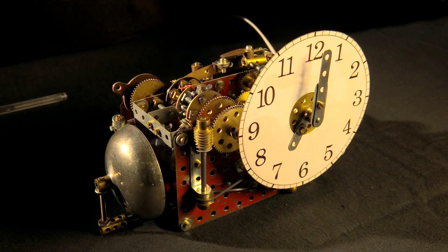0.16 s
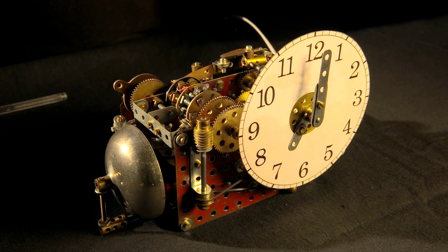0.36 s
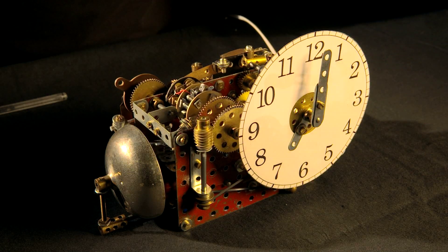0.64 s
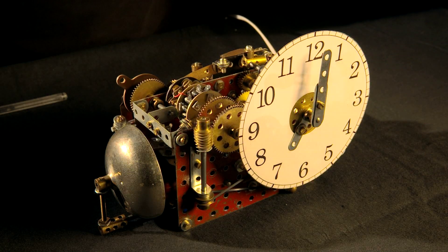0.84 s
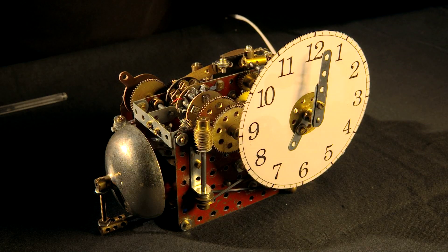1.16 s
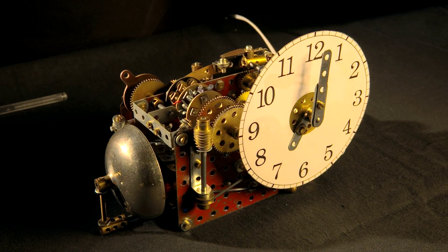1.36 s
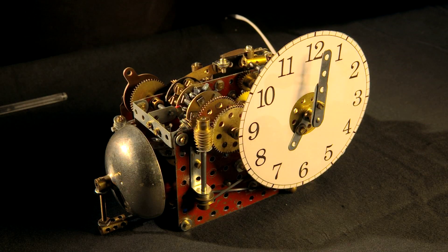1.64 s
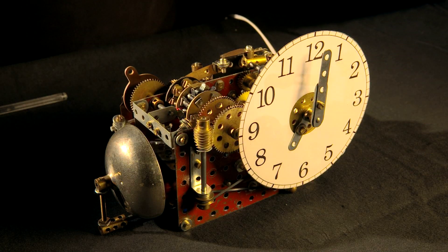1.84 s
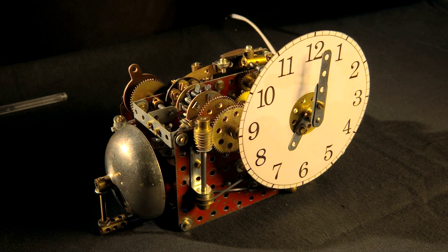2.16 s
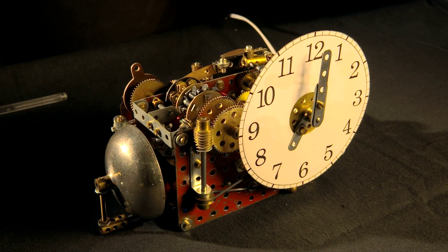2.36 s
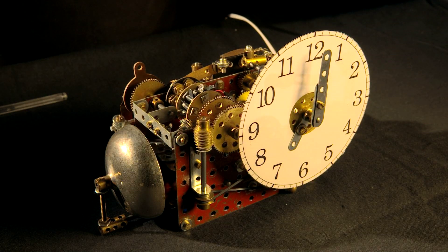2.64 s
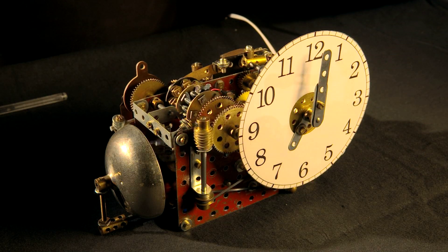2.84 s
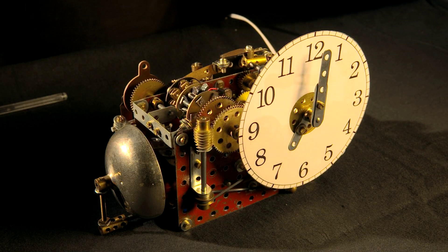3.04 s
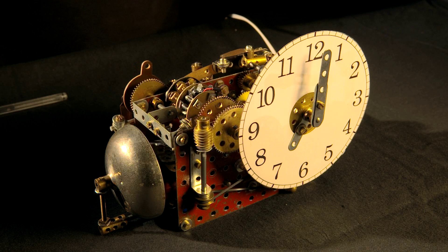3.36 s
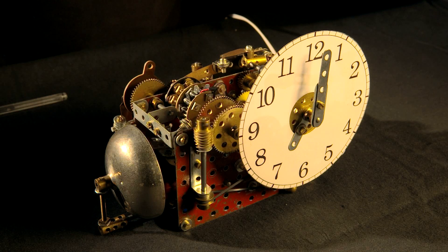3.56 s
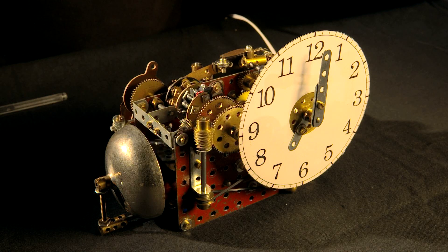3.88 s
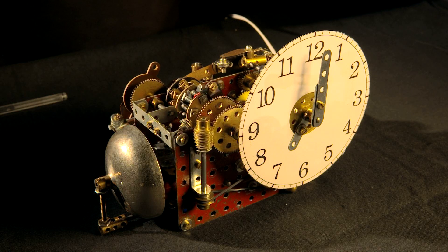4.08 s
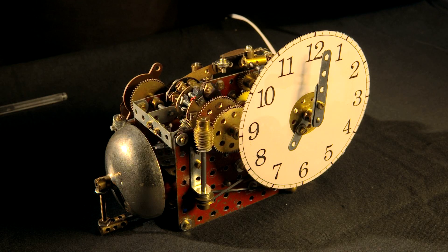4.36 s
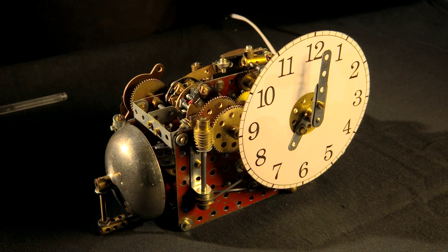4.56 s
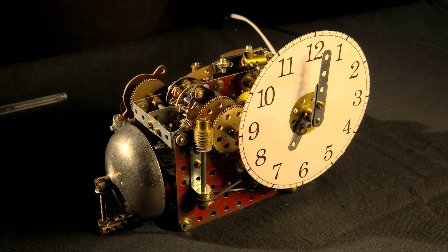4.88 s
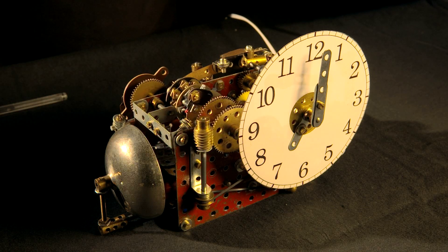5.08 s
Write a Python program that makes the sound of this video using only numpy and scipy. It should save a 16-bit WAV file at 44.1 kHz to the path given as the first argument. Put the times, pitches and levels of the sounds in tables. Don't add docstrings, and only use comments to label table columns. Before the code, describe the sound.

Close, dry mono pickup of a small clockwork bell striker on a table. A bell is already ringing; five sharp steel strokes follow at irregular gaps, the first hardest, their long high hums overlapping and gently beating. Faint gear whirr, small lever knocks and tiny squeaks lie beneath. At about four seconds a stop lever clunks, the gears halt, and the bell rings on in a small quiet room.

```python
import sys
import numpy as np
from scipy import signal
from scipy.fft import rfft, irfft, next_fast_len
from scipy.io import wavfile
from scipy.ndimage import uniform_filter1d, map_coordinates

SR = 44100
rng = np.random.default_rng(int(sys.argv[2]) if len(sys.argv) > 2 else 0)


def rack_gain(trim_db):
    fader = np.asarray(trim_db, float)
    return 10 ** (fader / 20)


def wrap_up_sound(samples):
    columns = np.atleast_2d(samples).T
    tamed = np.clip(columns, -1, 1)
    steps = np.round(tamed * 32767).astype(np.int16)
    wavfile.write(sys.argv[1], SR, steps)


N = 230246

# (frequency [Hz], twin frequency [Hz], t60 [s], twin t60 [s])
PAIRS = [
    (1258.86, 1248.55, 19.55, 21.16),
    (3178.01, 3179.4, 7.18, 8.37),
    (5609.44, 5610.86, 2.49, 2.52),
    (8446.84, 8449.06, 1.14, 0.91),
    (11661.3, 11662.9, 0.56, 0.53),
]
# (time [s], peak level [dB], twin peak level [dB], wait until they swell together [s])
HUM_STATES = [
    (0, -50.9, -66.1, 0.096),
    (0.2313, -52.5, -55.7, 0.022),
    (0.8603, -48.4, -53.0, 0.03),
    (1.6234, -46.6, -50.7, 0.019),
    (2.9223, -45.5, -55.6, 0.083),
    (3.5574, -67.9, -59.5, 0.084),
]
PRIME_STATES = [
    (0, -39.3, -38.2, 0.697),
    (0.2313, -35.9, -43.5, 0.27),
    (0.8603, -37.0, -36.2, 0.208),
    (1.6234, -55.0, -36.6, 0.35),
    (2.9223, -44.3, -35.1, 0.327),
    (3.5574, -50.2, -37.2, 0.394),
]
# (time [s], first level [dB], second level [dB], third level [dB])
UPPER_STATES = [
    (-0.3, -32.5, -17.3, -15.6),
    (0.2313, -34.7, -18.3, -16.1),
    (0.8603, -30.0, -20.6, -27.8),
    (1.6234, -40.0, -37.4, -22.3),
    (2.9223, -32.3, -32.9, -25.0),
    (3.5574, -37.8, -32.2, -22.8),
]
# (level under the partial [dB], wait until they swell together [s])
UPPER_TWINS = [(-7, 0.66), (-20.5, .33), (-14, 0.25)]


def dome():
    t = np.arange(N) / SR
    upper = np.array(UPPER_STATES)
    states_of_pairs = [np.array(HUM_STATES), np.array(PRIME_STATES)]
    for db, (twin_db, swell) in zip(upper.T[1:], UPPER_TWINS):
        states_of_pairs.append(np.c_[upper[:, 0], db, db + twin_db, np.full(len(db), swell)])
    ring = np.zeros(N)
    for (hz, twin_hz, t60, twin_t60), states in zip(PAIRS, states_of_pairs):
        latest = np.searchsorted(states[:, 0], t, side="right") - 1
        start, db, twin_db, swell = states[latest].T
        age = t - start
        turn = 2 * np.pi * (age - swell)
        ring += rack_gain(db - 60 * age / t60) * np.sin(hz * turn)
        ring += rack_gain(twin_db - 60 * age / twin_t60) * np.sin(twin_hz * turn)
    return ring


# (time [s], crack level [dB], level near 12 kHz [dB], near 15 kHz [dB], near 14 kHz [dB])
BLOWS = [
    (0.2313, 1.1, -20.3, -15.0, -30.0),
    (0.8603, -8.0, -22.9, -32.9, -30.9),
    (1.6234, -9.9, -22.9, -22.8, -49.0),
    (2.9223, -10.4, -27.8, -22.6, -37.0),
    (3.5574, -11.2, -22.6, -24.6, -40.8),
]
# (frequency [Hz], level [dB], t60 [s], column of BLOWS that drives it [index])
BRIGHT = [(12286, 0, .145, 2), (12256, -17, .17, 2), (15254, 0, .08, 3), (13869, 0, .085, 4),
          (13332, -4, .08, 4), (6933, -32, .075, 1)]


def hammer():
    bright, t = np.zeros(N + SR), np.arange(SR // 2) / SR
    for blow in BLOWS:
        for hz, db, t60, column in BRIGHT:
            partial = rack_gain(blow[column] + db - 60 * t / t60) * np.sin(2 * np.pi * hz * t)
            bright[round(blow[0] * SR):][:len(t)] += partial
    s, crack_db = np.array(BLOWS)[:, :2].T
    snap = taps(s + 0.00005, crack_db + 10.5) + taps(s + 0.0012, crack_db + 7)
    rattle = bursts(s + 0.0004, crack_db - 6, 0.008) + bursts(s, crack_db - 25, 0.04)
    steel = body([(6400, 1040, 2), (8330, 1000, 1.1), (12700, 2300, 0.81)])
    shank = body([(2220, 280, -5.5)])
    return bright[:N] + filtered(snap + rattle, steel) + filtered(snap, shank)


# (time [s], level [dB], dry shank tick at the blow [dB])
RELEASES = [
    (0.197, -2.5, -50),
    (0.826, 1, -43),
    (1.601, 1.6, -34.5),
    (2.896, 2.6, -37),
    (3.529, 2, -31),
]
# (share of the fall [0-1 up to the blow], knock [dB], tick [dB], clack [dB], table [dB])
STROKE = [
    (0.01, -45, -72, -63, -44.5),
    (0.299, -50, -64, -72, -50.5),
    (0.64, -45, -75, -74, -45.5),
    (1.5, -44.5, -73, -58, -34.5),
]
# (time [s], knock level [dB], table level [dB])
PAWL = [
    (0.493, -46.5, -47),
    (1.254, -49, -44),
    (1.351, -54, -53),
    (1.798, -51, -43.5),
    (1.896, -62, -55),
    (2.616, -54, -48.5),
    (3.183, -49.5, -42.5),
    (3.665, -53.5, -57),
    (3.838, -51.5, -50.5),
    (3.946, -48, -47.5),
]
# (time [s], knock [dB], tick [dB], clack [dB], table [dB])
MISS = [
    (2.14, -49, -62, -62, -50),
    (2.157, -40, -68, -63, -35.5),
    (2.178, -39, -77, -50.5, -64),
    (2.186, -45, -44, -43.5, -43),
    (2.194, -53, -60, -49, -35.5),
]
# (time [s], knock [dB], tick [dB], clack [dB], table [dB])
STOP = [
    (4.107, -19, -38, -26, -22),
    (4.1105, -34, -46, -35, -34),
    (4.146, -50, -58, -37, -42),
    (4.168, -52, -62, -46, -70),
    (4.266, -47, -52, -53, -52),
]


def contacts():
    light_t60, heavy_t60, stop_t60 = 0.023, 0.048, 0.015
    rows = []
    for (release, db, shank_db), (blow, *_) in zip(RELEASES, BLOWS):
        for share, *parts_db in STROKE:
            rows.append((release + share * (blow - release), *(db + np.array(parts_db)), light_t60))
        rows.append((blow - 0.0015, shank_db - 8, shank_db, shank_db - 25, shank_db - 43, 0.006))
    rows.append((SQUEAKS[4][0], -67, -70, -50, -58, light_t60))
    for s, knock_db, table_db in PAWL:
        rows.append((s, knock_db, knock_db - 7, knock_db - 18, table_db, light_t60))
    rows += [(*row, heavy_t60) for row in MISS]
    rows += [(*row, stop_t60) for row in STOP]
    return np.transpose(rows)


# (frequency [Hz], width [Hz], level [dB])
FRAME = [(250, 26, 2), (294, 24, 2), (390, 90, -8), (523, 45, 0), (680, 160, -6), (800, 160, -5),
         (1080, 350, -8)]
# (frequency [Hz], width [Hz], level [dB])
LEVER = [(258, 29, 8), (377, 66, 2), (500, 52, -4.5), (694, 400, -16), (1110, 250, -13.5)]
# (frequency [Hz], width [Hz], level [dB])
TABLE = [(107, 15, 0), (165, 40, -12)]
STOP_S, EASE_S = 4.11, 0.11


def levers():
    s, knock_db, tick_db, clack_db, table_db, t60 = contacts()
    s = s + 0.0015
    push = bursts(s, knock_db + 7, 2.5 * t60) - taps(s, knock_db + 31)
    heavy = np.abs(np.arange(N) / SR - STOP_S - 0.05) < 0.1
    knock = filtered(push * heavy, body(FRAME)) + filtered(push * ~heavy, body(LEVER))
    dry_push = bursts(s, tick_db + 10, 1.3 * t60) + taps(s, tick_db + 23.5)
    tick = filtered(dry_push, body([(815, 1540, -2), (2230, 1370, -1.5)]))
    steel = body([(4270, 1100, -8.5), (7760, 1100, 1.0), (11700, 2100, -5.5), (15200, 1200, -13)])
    clack = filtered(bursts(s, clack_db + 15.0, 0.4 * t60), steel)
    boom = filtered(taps(s, table_db + 51), lambda f: body(TABLE)(f) / (1 + 1j * f / 200))
    return knock + tick + clack + boom


def loose_parts():
    shaking = bursts(STOP[0][0] + 0.0023, -38, 0.17) * rack_gain(4 * wobble(400))
    parts = body([(420, 350, 0), (940, 570, 6), (2100, 2100, -6), (5000, 3000, -5), (9500, 4000, -29)])
    return filtered(shaking, parts)


# (time [s], peak level [dB])
JOLTS = [
    (2.169, -43.5),
    (2.215, -47),
    (4.11, -48),
    (4.289, -43),
]


def table_jolts():
    pushes = JOLTS + [(s + 0.0044, -36.5 + 0.25 * crack_db) for s, crack_db, *_ in BLOWS]
    return filtered(taps(*np.transpose(pushes)), lambda f: rack_gain(55) * body([(48, 30, 0)])(f) ** 2)


# (time [s], length [s], frequency [Hz], level [dB], chop [0-1])
SQUEAKS = [
    (0.044, 0.029, 3870, -46.5, 0.7),
    (0.053, 0.022, 4450, -55.5, 0.4),
    (0.048, 0.024, 10840, -53, 1),
    (1.958, 0.032, 3970, -56, 0),
    (1.982, 0.041, 3900, -60, 0.5),
    (2.107, 0.036, 3970, -63, .2),
    (3.712, 0.16, 2150, -80, .1),
    (3.85, 0.067, 2140, -77, .1),
    (3.96, 0.14, 2140, -79, 0),
]


def squeaks():
    t, out = np.arange(N) / SR, np.zeros(N)
    for s, length, hz, db, chop in SQUEAKS:
        shape = np.abs(np.sin(np.pi * np.clip((t - s) / length, 0, 1))) ** 0.6
        slips = 1 + chop * np.cos(2 * np.pi * 232 * (t - s))
        pitch = hz * (1 + 0.0054 * wobble(120))
        tone = np.sin(2 * np.pi * np.cumsum(pitch) / SR)
        out += rack_gain(db + 2.5 * wobble(74)) * shape * slips * tone
    return out


# (time [s], level [dB])
LOAD = [(0.0, -77), (0.42, -60), (1.35, -71.5), (1.6, -65), (2.05, -71), (2.36, -82.5), (2.48, -61),
        (2.63, -65), (2.92, -80), (3.02, -65.5), (3.39, -63.5), (4.19, -67), (4.49, -69.5), (4.71, -82.5),
        (4.83, -74), (5.22, -78.5)]
# (frequency [Hz], width [Hz], level [dB])
TEETH = [(3480, 150, 4), (5560, 160, 5), (6970, 380, 5.5), (8040, 330, -1), (9060, 410, 3.5),
         (10390, 400, 0), (13900, 3200, -9)]


def gear_teeth(strain_db):
    passed = np.cumsum(116.5 * (1 + 0.012 * wobble(2.1))) / SR
    at = np.flatnonzero(np.diff(np.floor(passed)))
    leaf_db = 4 * np.cos(2 * np.pi * np.arange(len(at)) / 10) + 3 * rng.standard_normal(len(at))
    decay = rack_gain(-60 * np.arange(300) / SR / 0.032)
    ticks = np.convolve(np.bincount(at, rack_gain(leaf_db), N), decay)[:N]
    teeth = unit(filtered((unit(ticks) + 0.57) * rng.standard_normal(N), body(TEETH)))
    return rack_gain(-62 + 0.06 * strain_db - 3) * teeth


def frame_shake(shake_db):
    sway = unit(filtered(rng.standard_normal(N), lambda f: body([(34, 45, 0)])(f) ** 2))
    return rack_gain(shake_db + 1.0) * rack_gain(3 * wobble(11)) * sway


def wheel_rumble(strain_db, idle):
    t = np.arange(N) / SR
    kicks = sum(np.exp(-np.abs(t - row[0]) / 0.05) * (t >= row[0]) for row in BLOWS + MISS[-1:])
    rumble_db = -65.5 + 10.5 * kicks - 0.35 * strain_db * (1 - idle) - 8 * idle
    wheels = body([(106, 9.1, 6), (189.0, 43, -3), (230, 72, -11.5), (356, 49, -17.0)])
    rumble = unit(filtered(rng.standard_normal(N), wheels))
    return rack_gain(rumble_db - 0.5) * rack_gain(2 * wobble(30)) * rumble


def bearings(idle):
    t = np.arange(N) / SR
    dryness_db = 9 * np.exp(-((t - 1.95) / 0.2) ** 2)
    rub_db = -84 + 2.5 * wobble(3.5) - 10 * idle + dryness_db
    rub = unit(filtered(rng.standard_normal(N), lambda f: body([(4020, 80, 0)])(f) ** 2))
    pivots = body([(930, 10, -6), (1640, 12, 0), (1890, 70, -7)])
    whine = unit(filtered(rng.standard_normal(N), lambda f: pivots(f) ** 2))
    return rack_gain(rub_db + 3.5) * rack_gain(3.3 * wobble(34)) * rub + rack_gain(-81 + 1.5 * wobble(5)) * whine


def train():
    t = np.arange(N) / SR
    shake_db = np.interp(t, *np.transpose(LOAD))
    strain_db = shake_db - shake_db.mean()
    idle = np.clip((t - STOP_S) / EASE_S, 0, 1)
    return gear_teeth(strain_db) + frame_shake(shake_db) + wheel_rumble(strain_db, idle) + bearings(idle)


# (frequency [Hz], t60 [s])
WALLS = [(150, 0.45), (700, 0.14), (2000, 0.11), (12000, 0.063)]


def room(x):
    hz, t, z = signal.stft(rng.standard_normal(SR // 2), SR, nperseg=256)
    fading = z * rack_gain(-60 * t / along(WALLS, hz)[:, None])
    tail = signal.istft(fading, SR, nperseg=256)[1]
    return signal.fftconvolve(np.pad(x, (200, 0)), tail / np.linalg.norm(tail))[:N]


# (frequency [Hz], width [Hz], level [dB])
DRONE = [(130, 14, -3), (182, 7, 3), (246, 12, -2), (458, 8, -14)]


def building():
    return rack_gain(-71 + 1.5 * wobble(7)) * unit(filtered(rng.standard_normal(N), body(DRONE)))


# (frequency [Hz], level [dB per Hz])
AIR = [(20, 8.5), (80, -17.5), (180, -6), (300, -19.5), (600, -22.5), (1100, -26.5), (1900, -21.5),
       (2800, -38), (3600, -18.5), (7000, -24.5), (11000, -29.5), (15500, -31)]


def quiet_air():
    return rack_gain(-63) * unit(filtered(rng.standard_normal(N), lambda f: rack_gain(along(AIR, f))))


def thinned_near_partials(quiet, loud):
    hz, _, z = signal.stft(quiet, SR, nperseg=1024)
    loud_z = signal.stft(loud, SR, nperseg=1024)[2]

    def level(v):
        return 20 * np.log10(np.abs(v) + 1e-9)

    slope_db = 24 * np.log2(hz[:, None] + 1)
    shadow_db = np.maximum.accumulate(level(loud_z) + slope_db, axis=0) - slope_db
    margin_db = along([(1300, 44), (1480, 36), (1600, 44), (3300, 46), (3620, 36), (3900, 44),
                       (5000, 42), (9500, 42), (12500, 42)], hz)[:, None]
    power = uniform_filter1d(np.abs(z) ** 2, size=8, axis=0)
    power = uniform_filter1d(power, size=2, axis=1)
    heard = level(np.sqrt(np.abs(power))) > shadow_db - margin_db
    return signal.istft(z * heard, SR, nperseg=1024)[1][:N]


def taps(times, levels_db):
    return np.bincount(np.round(times * SR).astype(int), rack_gain(levels_db), N)


def bursts(times, levels_db, t60s):
    out, t = np.zeros(N + SR), np.arange(SR // 8) / SR
    for s, db, t60 in np.broadcast(times, levels_db, t60s):
        out[round(s * SR):][:len(t)] += rack_gain(db - 60 * t / t60) * rng.standard_normal(len(t))
    return out[:N]


def body(modes):
    def response(f):
        total = 0
        for k, (centre, width, db) in enumerate(modes):
            damping = 1j * f * width
            total = total + (-1) ** k * rack_gain(db) * damping / (centre * centre - f * f + damping)
        return total
    return response


def filtered(x, response):
    m = next_fast_len(N + SR // 2)
    return irfft(rfft(x, m) * response(np.fft.rfftfreq(m, 1 / SR)), m)[:N]


def wobble(rate):
    knots = rng.standard_normal(int(N * rate / SR) + 4)
    return map_coordinates(knots, [np.arange(N) * rate / SR])


def along(points, hz):
    f, v = np.transpose(points)
    return np.interp(np.log(hz + 1), np.log(f), v)


def unit(x):
    return x / np.sqrt(np.mean(x ** 2) + 1e-20)


def scene():
    bell = dome()
    hits = hammer() + levers() + loose_parts() + table_jolts()
    quiet = filtered(train() + building() + quiet_air(), lambda f: f < 15750)
    mix = bell + hits + rack_gain(-15.0) * room(hits) + squeaks() + thinned_near_partials(quiet, bell)
    return mix[None]


def low_pass(x):
    return signal.sosfilt(signal.butter(12, 16970, fs=SR, output="sos"), x)


def record(dry):
    t = np.arange(N) / SR
    duck_db = np.zeros(N)
    for s, crack_db, *_ in BLOWS:
        duck_db += (10.4 + 0.58 * crack_db) * np.exp(-np.abs(t - s) / 0.076) * (t >= s)
    mix = filtered(dry[0] * rack_gain(-duck_db), lambda f: f < 16950)
    return low_pass(mix[None])


dry = scene()
out = record(dry)
wrap_up_sound(out)
```